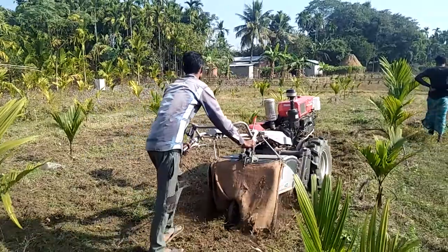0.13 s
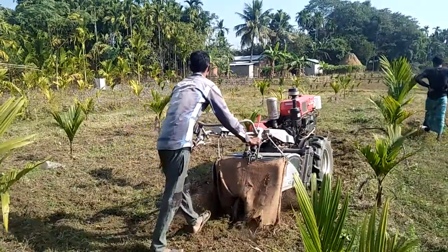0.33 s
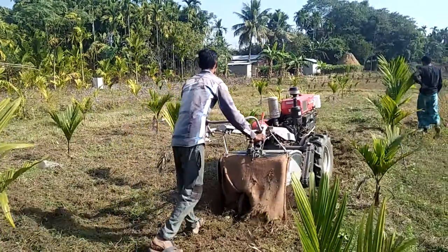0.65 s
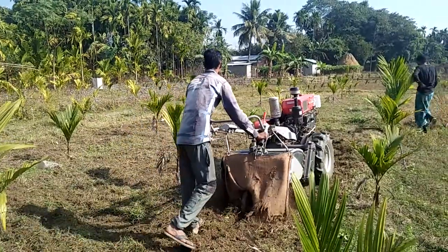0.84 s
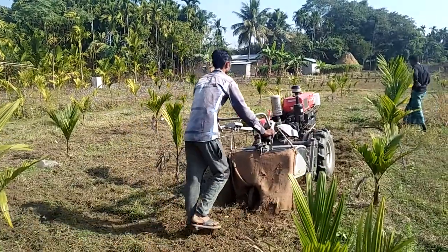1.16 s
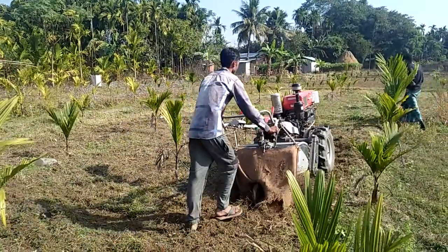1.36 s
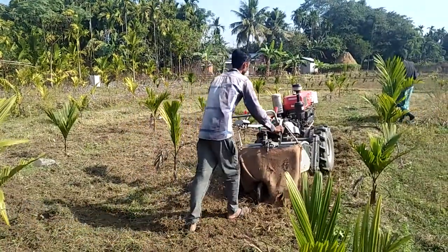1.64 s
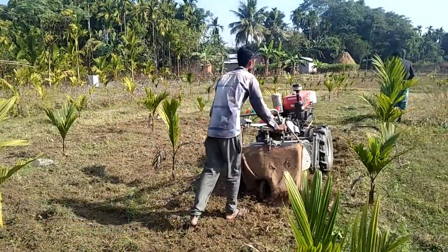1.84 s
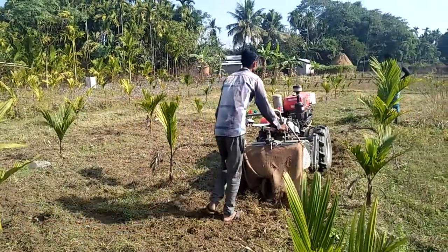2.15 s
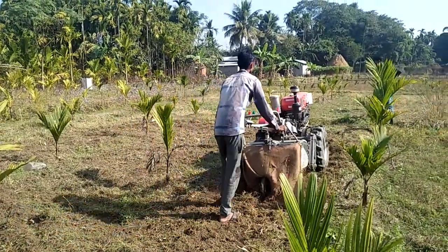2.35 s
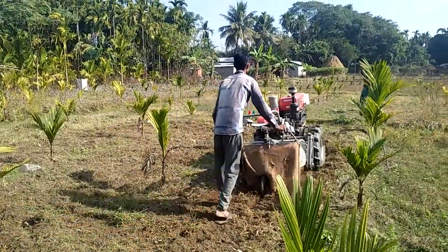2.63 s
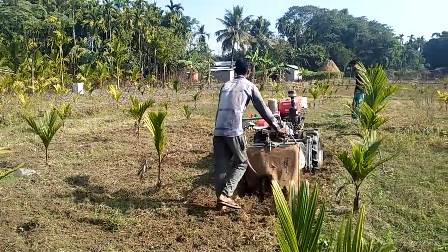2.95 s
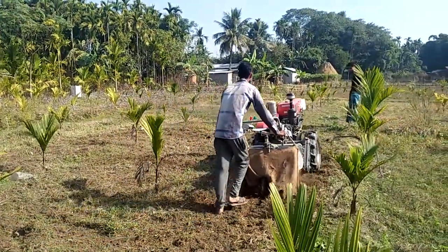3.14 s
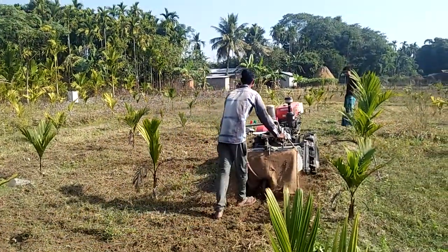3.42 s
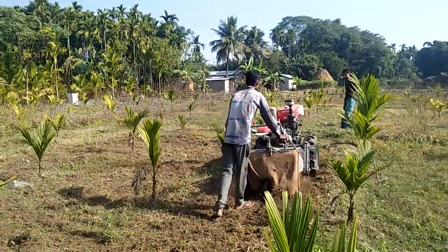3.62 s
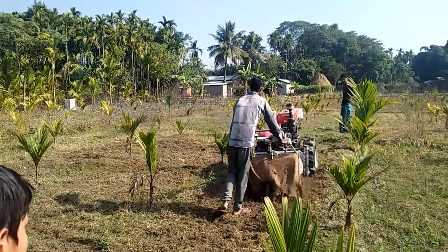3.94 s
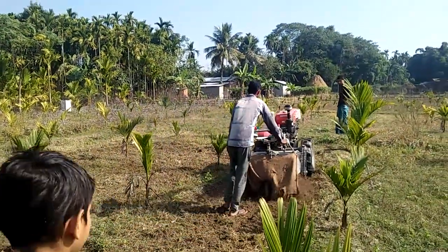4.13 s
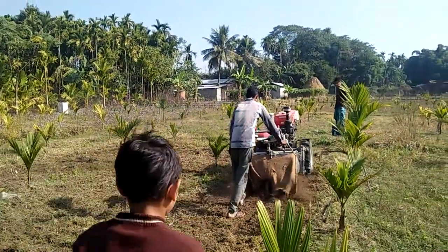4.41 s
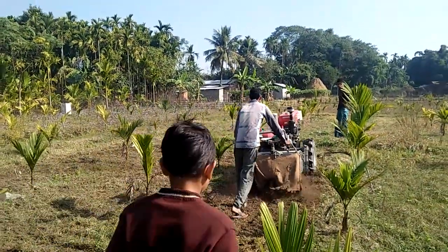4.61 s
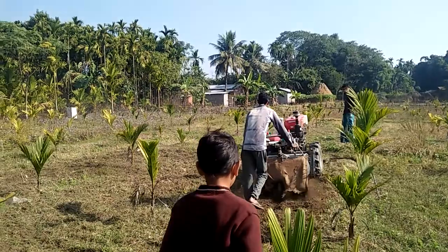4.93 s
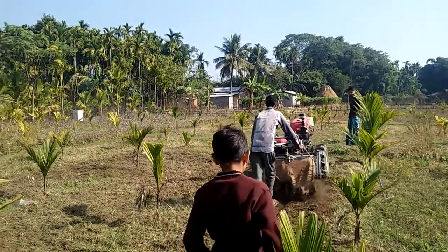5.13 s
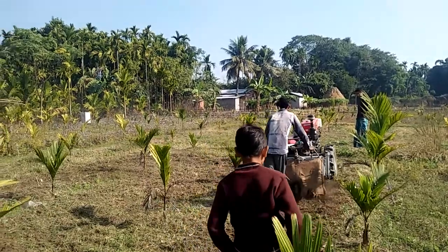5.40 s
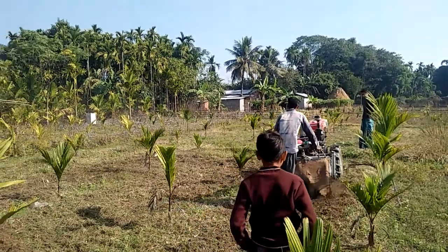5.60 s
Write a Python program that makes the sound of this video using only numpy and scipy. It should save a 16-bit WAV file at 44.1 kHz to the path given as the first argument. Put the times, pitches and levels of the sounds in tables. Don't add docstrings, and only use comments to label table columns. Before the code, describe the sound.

A single-cylinder diesel tiller works in an open field, heard from about five metres on a phone, dry and almost mono, with trimmed deep bass and rounded peaks. From 0 to 2.3 s it idles evenly at about ten firings a second: each beat is a hard metallic knock and a low, dull exhaust thump, with valves tapping between, tines rattling steadily and loose tinware ticking and hissing. At about 2.3 s the throttle opens; the exhaust grows louder and sharper, spitting bright bursts of gas, and the beats quicken to over sixteen a second by 4.5 s, with rough rising gear tones. The clatter recedes slightly as the machine walks away. Around 4.5 s it eases, and at 4.8 s the fuel is cut: the thumps drop to soft airy puffs and duller clatter. From 5.3 s a thin, wavering gear whine sinks as it slows, still turning at the end, 5.76 s.

```python
import sys
import numpy as np
from scipy import signal
from scipy.fft import rfft, irfft
from scipy.io import wavfile
from scipy.ndimage import uniform_filter1d

SR = 44100
rng = np.random.default_rng(int(sys.argv[2]) if len(sys.argv) > 2 else 0)


def how_loud(loudness_db):
    steps = np.asarray(loudness_db, float) / 20
    return 10 ** steps


def log_audio(samples):
    frames = np.atleast_2d(samples).T
    limited = np.clip(frames, -1, 1)
    pcm = np.round(limited * 32767).astype(np.int16)
    wavfile.write(sys.argv[1], SR, pcm)


N = 254016
T = np.arange(N) / SR


def unit(x):
    return x / np.sqrt(np.mean(x ** 2))


def colour(x, points):
    hz, db = np.transpose(points)
    f = np.maximum(np.fft.rfftfreq(N, 1 / SR), 1)
    return irfft(rfft(x) * how_loud(np.interp(np.log(f), np.log(hz), db)), N)


def beats(turn, place, scatter_db, jitter_ms):
    cycles = np.arange(-1, 80)
    size, lateness = rng.uniform(-1.7, 1.7, (2, len(cycles)))
    at = np.interp(cycles + place, turn, np.arange(N), -SR, -SR) + lateness * jitter_ms * SR / 1000
    inside = (at >= 0) & (at < N)
    pulses = np.zeros(N)
    pulses[at[inside].astype(int)] = how_loud(scatter_db * size[inside])
    return pulses


def burst(pulses, decay_ms, rise_ms):
    t = np.arange(SR // 8) * 1000 / SR
    shape = (1 - np.exp(-t / rise_ms)) * np.exp(-t / decay_ms)
    return signal.fftconvolve(pulses, shape)[:N]


def grit(spread_db):
    grains = np.repeat(rng.standard_normal(N // 32 + 1), 32)[:N]
    return rng.standard_normal(N) * how_loud(spread_db * grains)


def ring(hits, hz, t60):
    pole = np.exp(2j * np.pi * hz / SR - np.log(1000) / (t60 * SR))
    return signal.lfilter([1], [1, -pole], hits).imag


def controls(hz):
    # (time [s], pressure [dB])
    throttle = [
        (0, -18),
        (2.24, -20),
        (2.35, -15.5),
        (2.44, -12),
        (3.4, -10.5),
        (4.43, -11),
        (4.58, -14.5),
        (4.79, -17.5),
        (4.87, -29),
        (5.76, -27),
    ]
    idle_db, idle_hz = -19.5, 10.2
    distance_m, walk_m_s = 5.14, 0.9
    pressure_db = np.interp(T, *np.transpose(throttle))
    load_db, faster = pressure_db - idle_db, hz - idle_hz
    away_db = -20 * np.log10(1 + walk_m_s * T / distance_m)
    easing_db = pressure_db - np.maximum.accumulate(pressure_db)
    knock_db = -20 + 0.49 * away_db - 0.84 * faster + easing_db
    clatter_db = -31 + away_db + 0.26 * faster + 0.4 * np.maximum(load_db, 0)
    jet_db = np.minimum(-44 + 3.33 * load_db, -16.5)
    return pressure_db, knock_db, clatter_db, jet_db


def chamber_rings(pulses, pressure_db, chambers):
    t, lead, out = np.arange(SR // 8) * 1000 / SR, SR // 50, 0
    for hz, db, start_ms, swell_ms, sign, growth in chambers:
        u = np.maximum(t - 1000 * lead / SR - start_ms, 0)
        swell = (u / swell_ms / 2) ** 2 * np.exp(2 - u / swell_ms)
        response = sign * swell * np.sin(2 * np.pi * hz * u / 1000)
        driven = pulses * how_loud(db + growth * pressure_db)
        out = out + signal.fftconvolve(driven, response)[lead:lead + N]
    return out


def exhaust(turn, pressure_db, fired):
    # (frequency [Hz], level [dB], start [ms], swell [ms], sign, growth with pressure [dB per dB])
    firing_pipe = [(113.7, -1, -9.5, 3.15, -0.8, 0.78), (65.3, -11.5, -7.5, 0.88, 0.81, 2.82),
                   (111, -15, 17, 1.42, -1.3, 0.24), (454, -15.5, -8, 4.14, 0.64, 0.55),
                   (566, -14, -5, 2.14, 1, 1.64), (267, -15.5, -7, 0.62, 1, 0.19),
                   (94, -22.5, 45, 2.4, 0.9, 0.33), (202.5, -22.5, -4, 2.3, 0.72, 2)]
    coasting_pipe = [(127, -10, -15.5, 2.8, 1, 0.72), (171, -0.5, 1.5, 1.35, 0.83, 0.73),
                     (60, -29, 1, 6, 0.9, 1)]
    gas_fronts = [
        (500, -6, -12.5, .45, 1, 1.5),
        (555, 0, -6, .5, 1, 1.6),
    ]
    pressure_db = pressure_db + 16
    puffs = beats(turn, 0, scatter_db=-0.4, jitter_ms=0.052)
    thump = how_loud(-13.0) * chamber_rings(puffs * fired, pressure_db, firing_pipe)
    breath = how_loud(-10.5) * chamber_rings(puffs * ~fired, pressure_db, coasting_pipe)
    return thump + breath + how_loud(-19.5) * chamber_rings(puffs * fired, pressure_db, gas_fronts)


def rap(firings, knock, knock_ms, pulling):
    first = np.zeros(N)
    first[0] = 1
    pattern = (burst(first, knock_ms, rise_ms=1.0) * grit(1.95))[:SR // 8]
    same = np.clip(0.68 + (0.31 - 0.68) * pulling, 0, 1)
    repeated = signal.fftconvolve(firings, pattern)[:N]
    return np.sqrt(same) * repeated + np.sqrt(1 - same) * knock * grit(1.5)


def combustion(turn, knock_db, fired, pulling):
    knock_ms = 17.4
    firings = beats(turn + 0.0287 * pulling, -0.29, scatter_db=1.4, jitter_ms=0.39) * fired * how_loud(knock_db)
    knock = burst(firings, knock_ms, rise_ms=3.0)
    strikes = np.roll(firings, int(0.004007 * SR)) + 0.83 * np.roll(firings, int(0.0095 * SR))
    blows = how_loud(29.0) * uniform_filter1d(strikes, size=9)
    return knock, blows, rap(firings, knock, knock_ms, pulling)


def clatter(turn, clatter_db, fired):
    # (place [cycles], block level [dB], hiss level [dB], decay [ms])
    valves = [
        (-.05, 9, 6.5, 2.3),
        (0.211, -1, -2, 13.7),
        (0.352, -10.5, -9, 6.4),
        (.52, -1.5, -23, 4.9),
    ]
    coast_puff = (0.095, -4, -1, 8)
    body = hiss = 0
    for place, block_db, hiss_db, decay_ms in list(valves) + [coast_puff]:
        active = 1
        if place == coast_puff[0]:
            active = ~fired
        elif place < 0:
            active = fired
        taps = beats(turn, place, scatter_db=1.6, jitter_ms=1.3) * active
        tap = burst(taps, decay_ms, rise_ms=1.93) * how_loud(clatter_db)
        body = body + how_loud(block_db) * tap
        hiss = hiss + how_loud(hiss_db) * tap
    return body, hiss


def spit(turn, hz, jet_db, fired):
    spits = beats(turn + 0.0038 * hz, 0, scatter_db=2.04, jitter_ms=0.55) * fired * how_loud(jet_db)
    crack = burst(spits, decay_ms=2.3, rise_ms=2.2)
    return crack + how_loud(-17) * burst(spits, decay_ms=6.9, rise_ms=0.45)


def block(push, blows, state):
    # (frequency [Hz], idling level [dB], pulling level [dB], coasting level [dB], t60 [s])
    panels = [(430, -15, -16.5, -27, 0.1), (622.6, -33, 14, -16, 0.061), (708, 4, -6, -5, 0.17),
              (766.6, 7, -22, -17, 0.079), (947, 3.5, -3, -29, 0.048), (1034, -1.5, -8, 4, 0.2),
              (1254, 4.5, -6, -17, 0.1), (1397.5, 1, -40, -26, 0.13), (1477, 4, -12, -23, 0.085),
              (1677, -6.5, -10, -2, 0.15), (1881, -0.5, -6, -41, 0.09), (2000, -5, -3.5, 6, 0.086),
              (2303, 9, 5.5, 12.5, 0.025), (2630, 2, -41, -4, 0.049)]
    # (frequency [Hz], density [dB per Hz])
    firing_body = [(180, -55), (300, -48.5), (372, -41), (480, -28), (640, -4.5), (861, -3.5), (1820, -3.5),
                   (1970, -7.5), (2200, -4.5), (4500, -31), (5850, -37), (9900, -120)]
    coasting_body = [(180, -17), (300, 3.5), (344, -23), (372, -40), (804, -22), (1570, -30), (1700, -8.5),
                     (2890, -5.5), (4500, -30), (5850, -55), (9900, -120)]
    modes = 0
    for hz, idle_db, pull_db, coast_db, t60 in panels:
        gain = how_loud(np.array([idle_db, pull_db, coast_db]) @ state)
        modes = modes + ring(gain * (push + blows), hz, t60)
    coasting = state[2]
    broad = colour(push * (1 - coasting), firing_body) + how_loud(-2.0) * colour(push * coasting, coasting_body)
    modes = colour(modes, [(200, -30), (420, 4)])
    return unit(unit(broad) + how_loud(-1.5) * unit(modes))


def tines(clatter_db):
    # (frequency [Hz], density [dB per Hz])
    tine_colour = [(59, -74), (100, 15), (139, -9), (265, 2.5), (375, 1.5), (1010, -1), (1280, -2.5),
                   (1960, 0), (2950, -10.5), (4300, -27.5), (5590, -73), (9460, -120)]
    return unit(colour(grit(1.4), tine_colour)) * how_loud(-42 + clatter_db + 34)


def treble(envelope, points):
    mid, side = (colour(envelope * grit(1.77), points) / np.std(colour(rng.standard_normal(N), points))
                 for _ in range(2))
    side = how_loud(-12) * colour(side, [(3500, -80), (4300, -84), (5000, -15), (9000, 1.8)])
    return np.array([mid + side, mid - side])


def ticks(shake):
    # (frequency [Hz], level [dB], t60 [s])
    tinware = [(5570, -8.5, .012), (7200, -1, 0.013), (8350, 1, .015), (9700, -2, 0.011),
               (10160, -25, 0.011), (11040, -1, .012), (13400, -22, .012)]
    ticks_per_s, out = 70, 0
    for hz, db, t60 in tinware:
        chance, softness = rng.random((2, N))
        hits = (chance < ticks_per_s / SR) * how_loud(db - 30 * softness)
        out = out + ring(hits * shake, hz, t60)
    return how_loud(1.5) * out


def rattle(shake, jet):
    # (frequency [Hz], density [dB per Hz])
    tin_hiss = [(1880, -1), (3200, -11.5), (4010, -17), (4360, -21), (6860, -6.5), (7960, 1.5), (8600, -5),
                (9790, -0.5), (13400, -15.5), (14330, -11), (14480, -70)]
    return how_loud(-1.5) * treble(shake, tin_hiss) + ticks(shake + how_loud(15.0) * jet)


def jet_hiss(jet):
    # (frequency [Hz], density [dB per Hz])
    jet_colour = [(1530, -61), (2600, -2), (4280, -18), (5300, -6.5), (9590, 2), (12700, -9), (14330, -11),
                  (14480, -48), (15000, -39)]
    return treble(how_loud(8.5) * jet, jet_colour)


def mesh(turn, shake):
    # (teeth met per firing [count], level [dB], width [Hz])
    timing_gears = [(59, -45, 90), (147, -35, 260)]
    out = 0
    for order, db, width_hz in timing_gears:
        rough = unit(uniform_filter1d(rng.standard_normal(N), int(SR / width_hz)))
        out = out + how_loud(db) * rough * np.sin(2 * np.pi * order * turn)
    return out * shake


def whine(turn):
    teeth_per_firing, start_s, rise_s = 45.6, 5.31, 0.04
    waver = unit(uniform_filter1d(rng.standard_normal((2, N)), SR // 60, axis=1))
    onset = np.clip((T - start_s) / rise_s, 0, 1)
    level_db = -39 + 2.5 * waver[0] + 2.5 * np.cos(2 * np.pi * turn)
    return onset * how_loud(level_db) * np.sin(2 * np.pi * teeth_per_firing * turn + 0.8 * waver[1])


def scene():
    # (time [s], firing rate [firings per s])
    speed = [(0.0, 10.1435), (1.0, 10.1356), (1.7, 10.201), (2.33, 10.2399), (2.5, 10.7421), (2.8, 11.7039),
             (3.2, 12.9405), (3.6, 14.0851), (4.0, 15.2487), (4.3, 16.005), (4.55, 16.5753), (4.8, 16.554),
             (5.05, 16.0613), (5.3, 15.322), (5.76, 14.0617)]
    # (frequency [Hz], level [dB])
    low_dips = [(30, -18), (48, -3.5), (60, 1.5), (335, -2.5), (372, -16), (410, 0.5), (485, 2.5), (522, -6),
                (550, 0)]
    start_turn, fuel_cut_s = -0.8873, 4.82
    hz = np.interp(T, *np.transpose(speed))
    turn = start_turn + np.cumsum(hz) / SR
    pressure_db, knock_db, clatter_db, jet_db = controls(hz)
    fired = T < fuel_cut_s
    pulling = fired * np.clip((hz - 10.3) / 0.76, 0, 1)
    state = np.array([fired - pulling, pulling, 1 - fired])

    thump = exhaust(turn, pressure_db, fired)
    knock, blows, knock_push = combustion(turn, knock_db, fired, pulling)
    body, hiss = clatter(turn, clatter_db, fired)
    jet = spit(turn, hz, jet_db, fired)

    push = how_loud(6.0) * knock_push + (how_loud(5) * body + how_loud(4.5) * jet) * grit(2.5)
    casting = np.sqrt(np.mean(push ** 2)) * how_loud(-3.0) * block(push, blows, state)
    gears = mesh(turn, pulling * unit(knock + how_loud(1.0) * jet))
    mono = colour(thump + casting + tines(clatter_db) + gears, low_dips) + whine(turn)
    shake = how_loud(-8 + 6.0 * pulling) * knock + hiss + how_loud(clatter_db - 15.5)
    return mono + rattle(shake, jet) + jet_hiss(jet)


def band_limit(x):
    return signal.sosfilt(signal.butter(12, 15470, fs=SR, output="sos"), x)


def record(dry):
    # (frequency [Hz], level [dB])
    port_dip = [(4100, 0), (4400, -5), (4700, 0)]
    mid, side = (dry[0] + dry[1]) / 2, (dry[0] - dry[1]) / 2
    mid = colour(np.tanh(1.278 * mid) / 1.301, port_dip)
    top = signal.ellip(8, 0.2, 70, 14750, fs=SR, output="sos")
    mix = signal.sosfilt(top, [mid + side, mid - side])
    return band_limit(mix)


dry = scene()
out = record(dry)
log_audio(out)
```